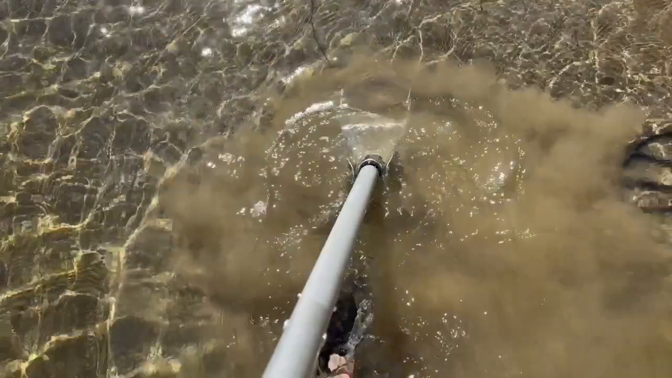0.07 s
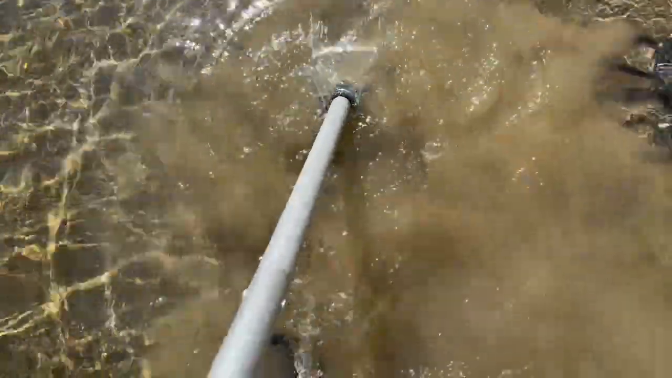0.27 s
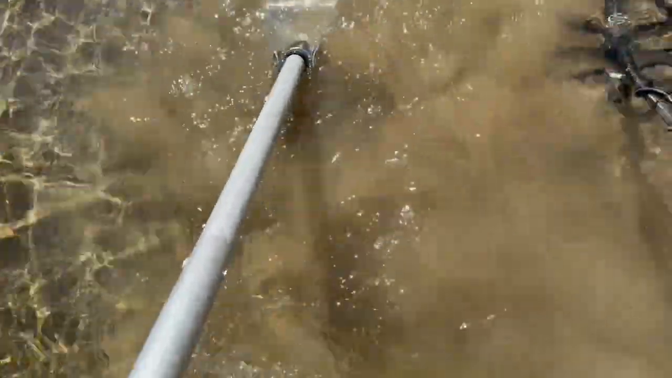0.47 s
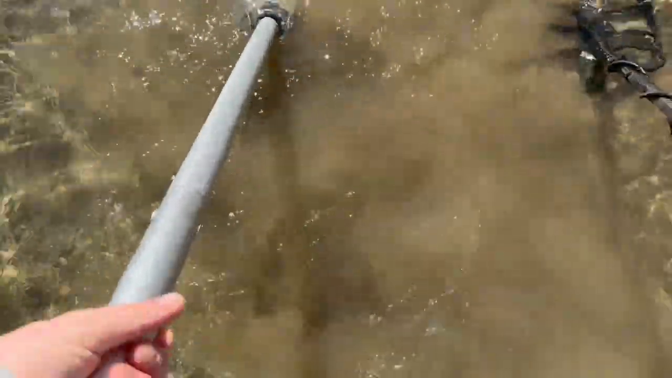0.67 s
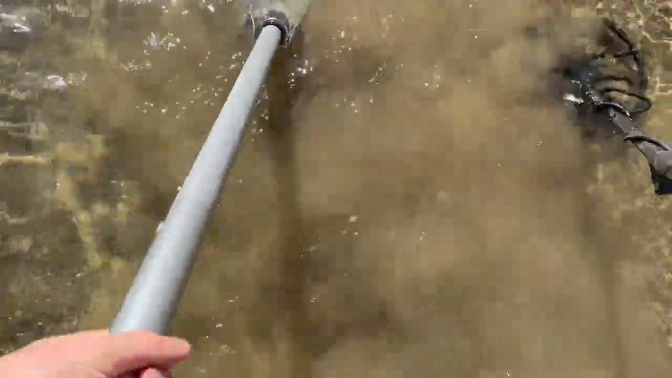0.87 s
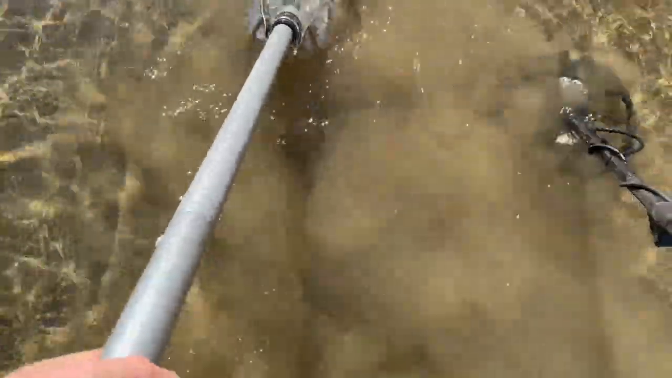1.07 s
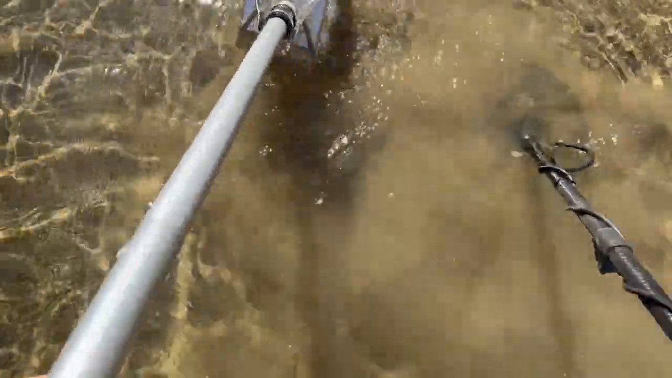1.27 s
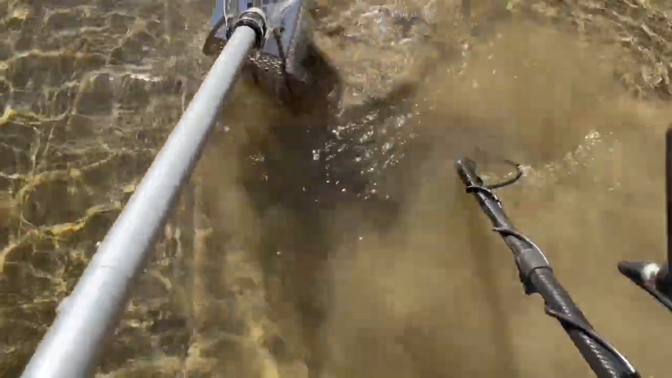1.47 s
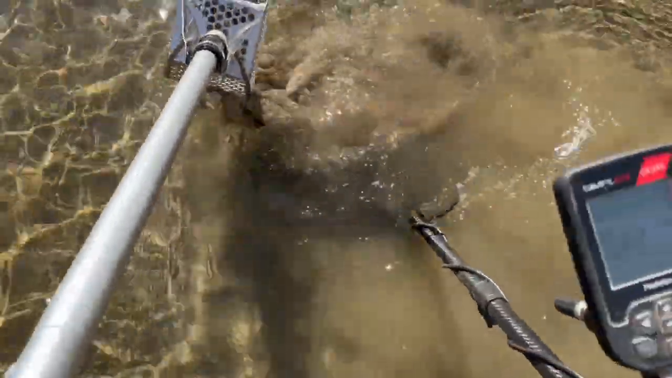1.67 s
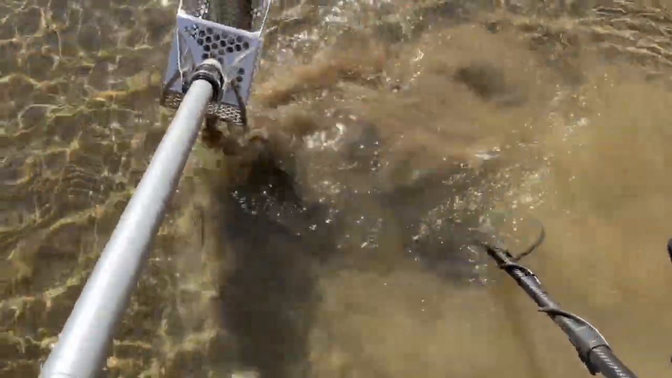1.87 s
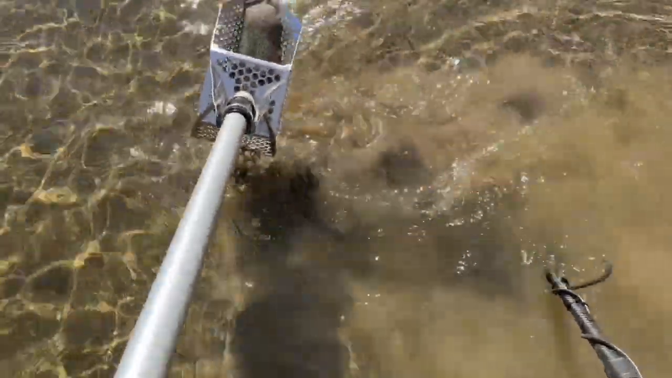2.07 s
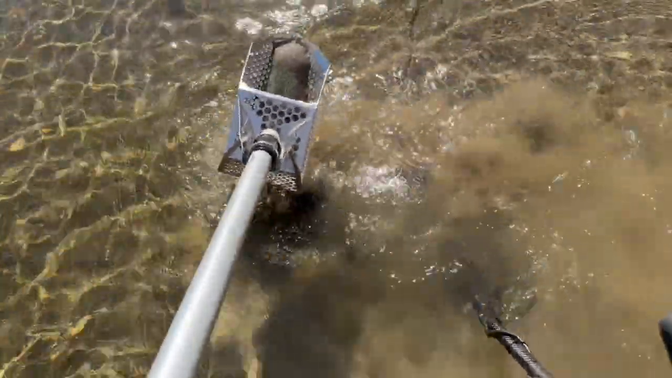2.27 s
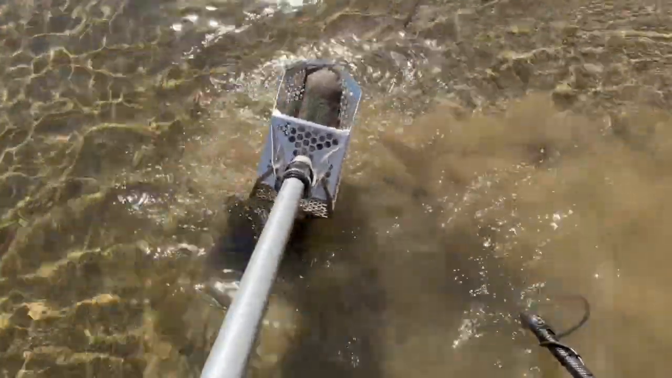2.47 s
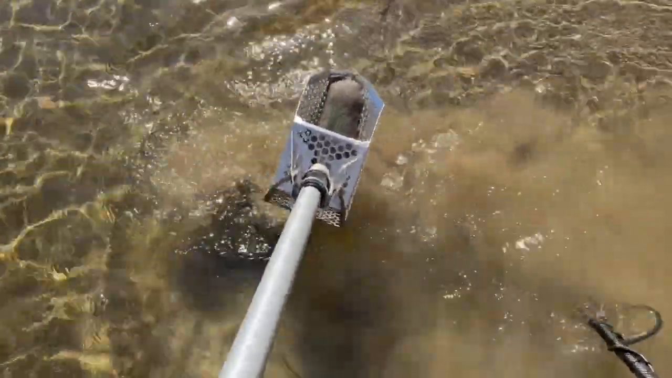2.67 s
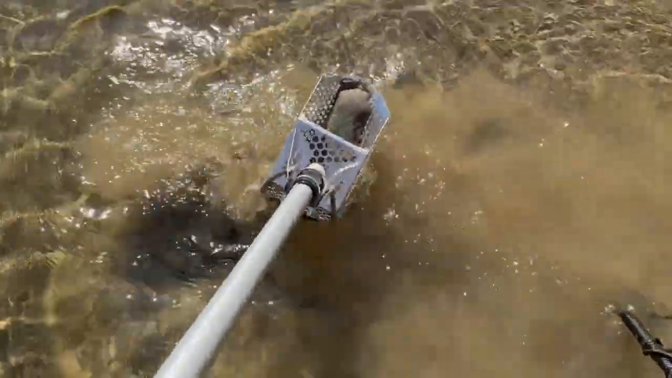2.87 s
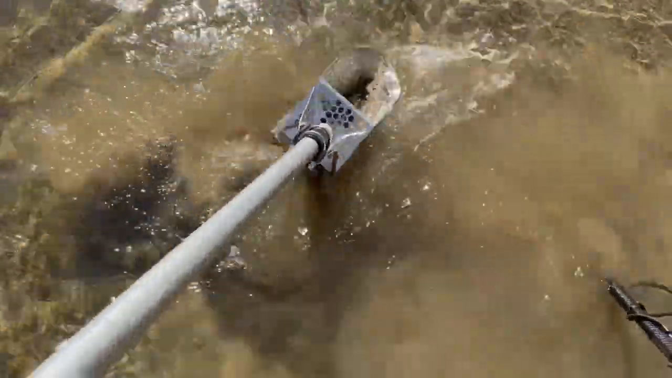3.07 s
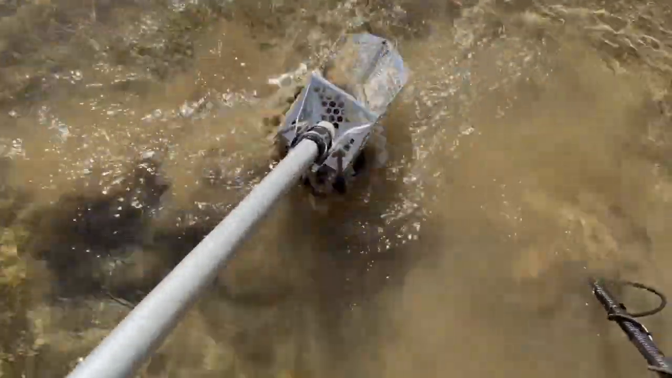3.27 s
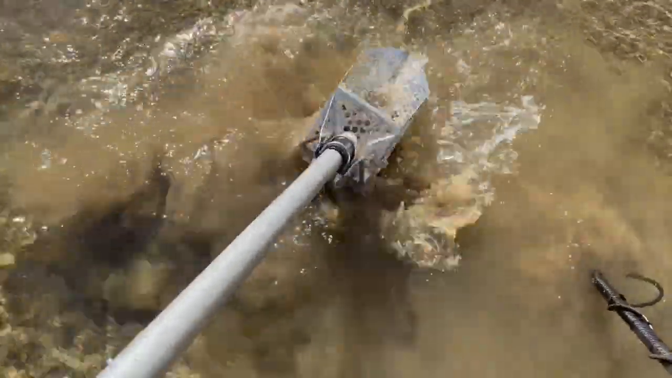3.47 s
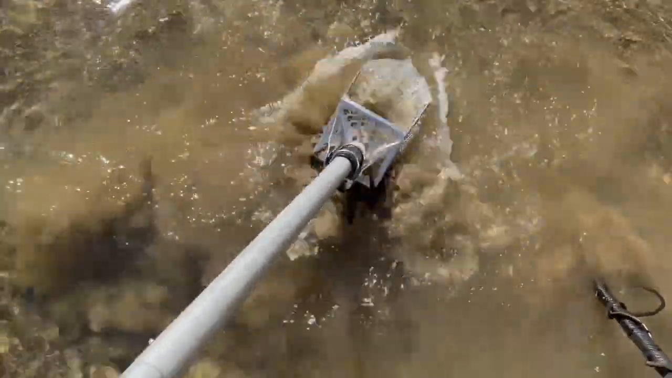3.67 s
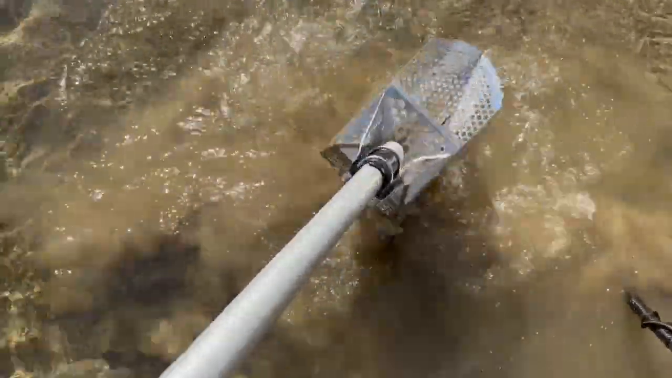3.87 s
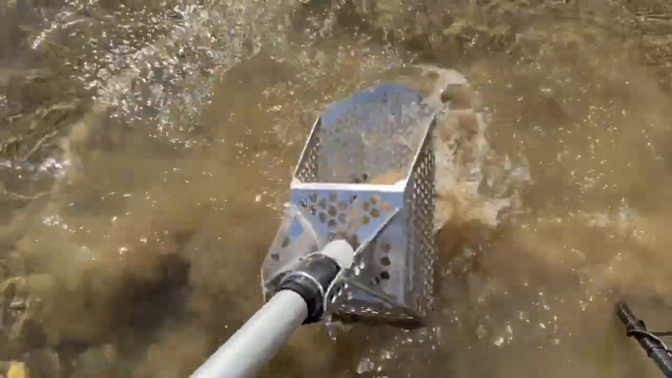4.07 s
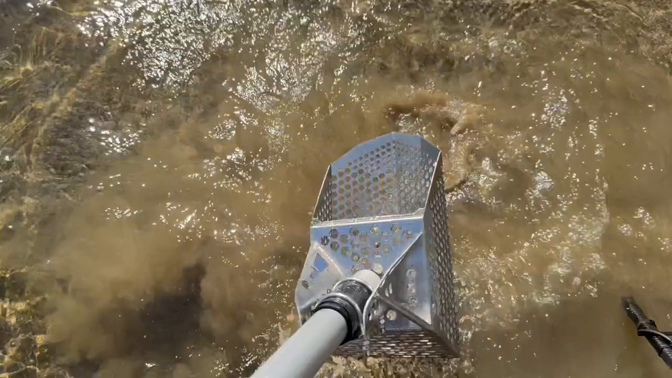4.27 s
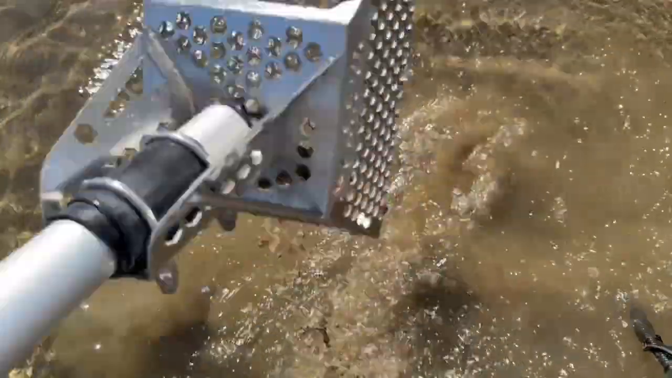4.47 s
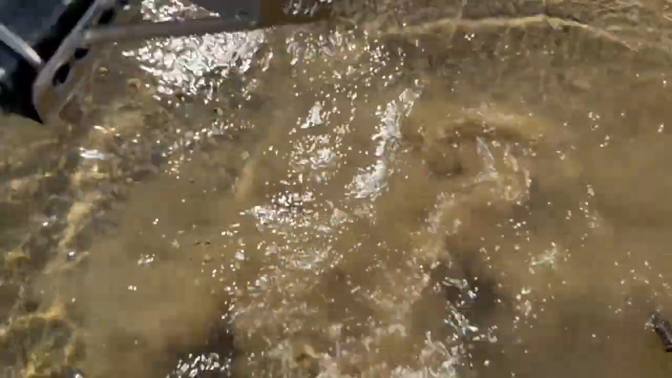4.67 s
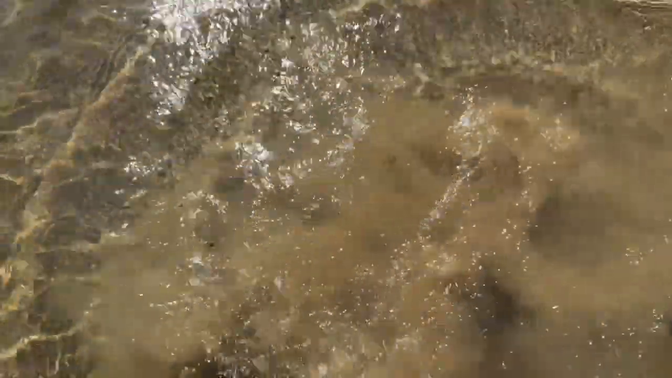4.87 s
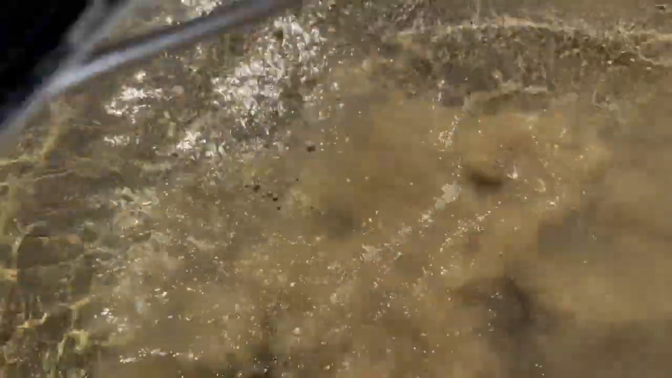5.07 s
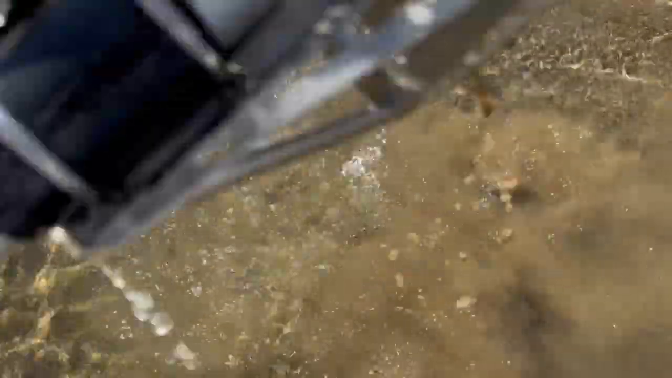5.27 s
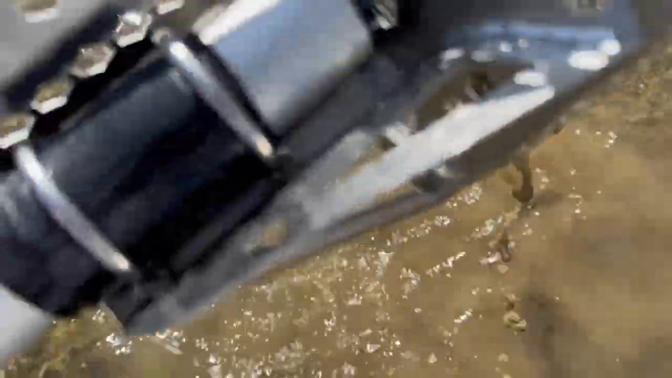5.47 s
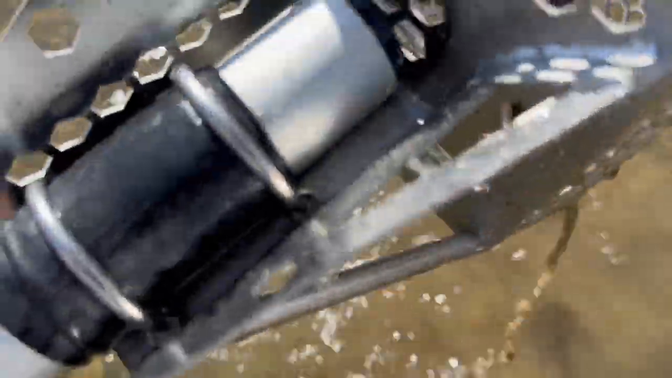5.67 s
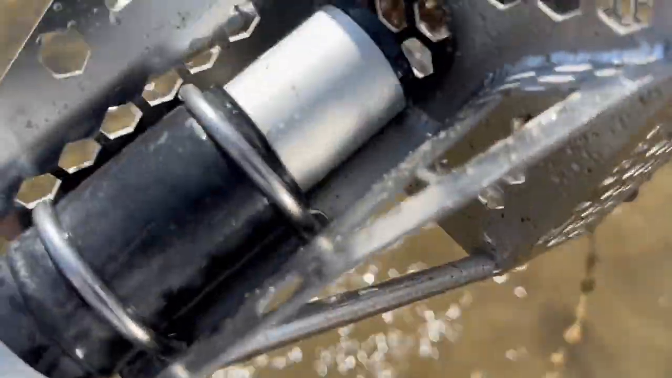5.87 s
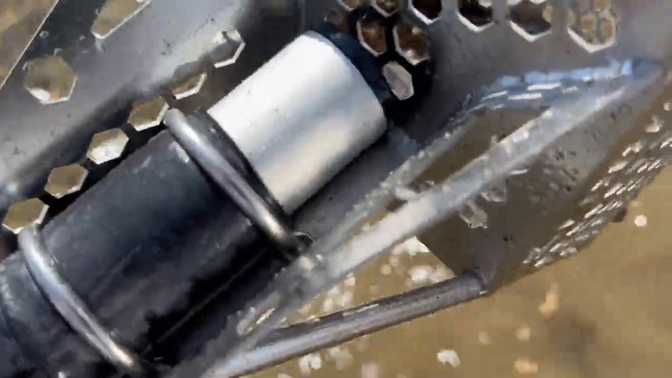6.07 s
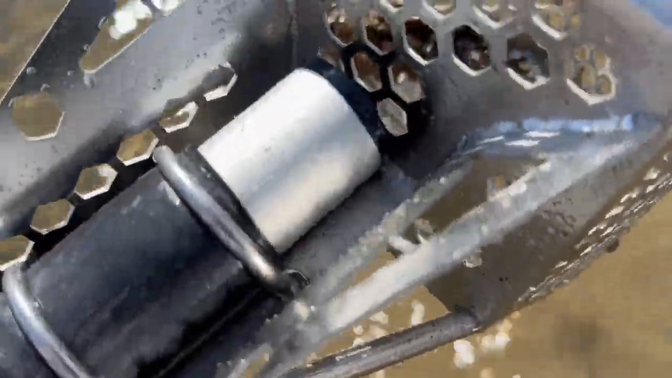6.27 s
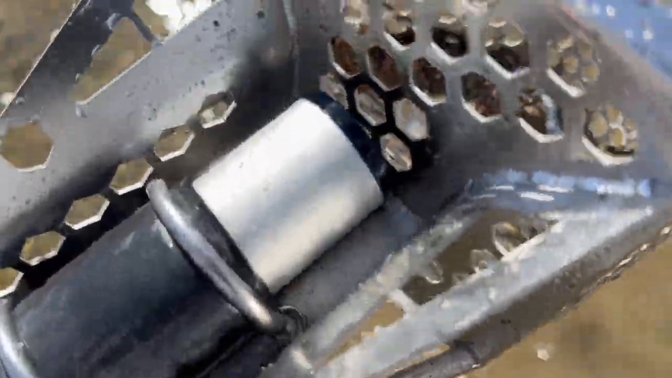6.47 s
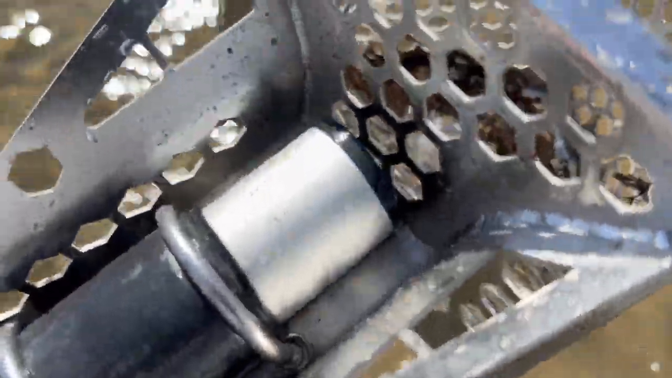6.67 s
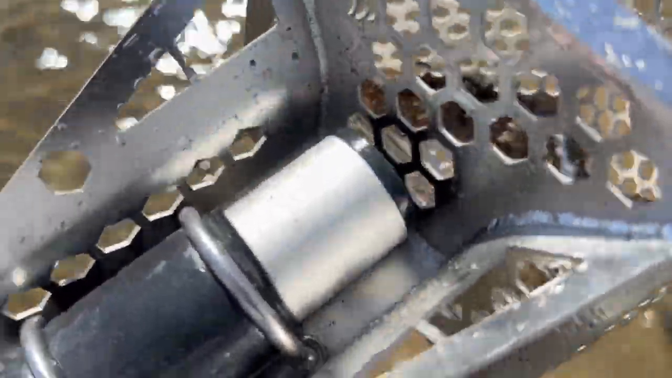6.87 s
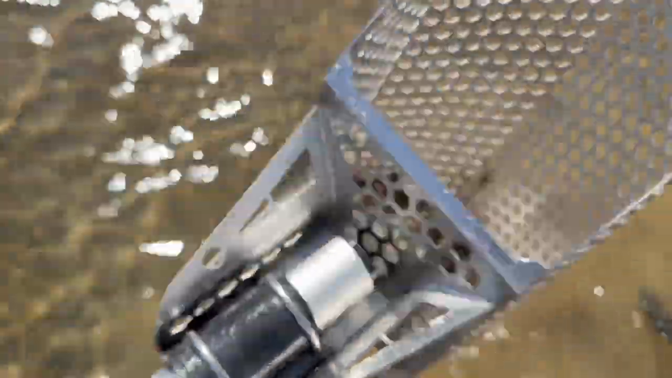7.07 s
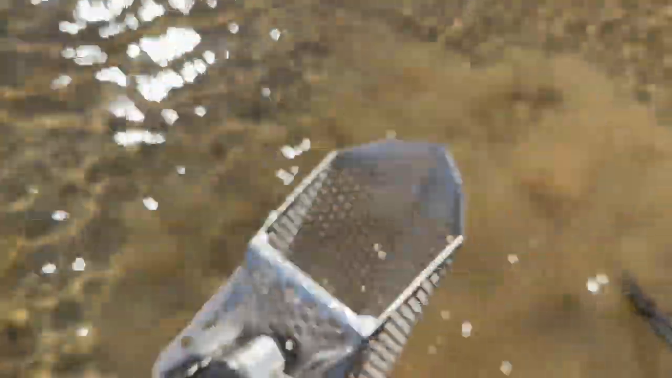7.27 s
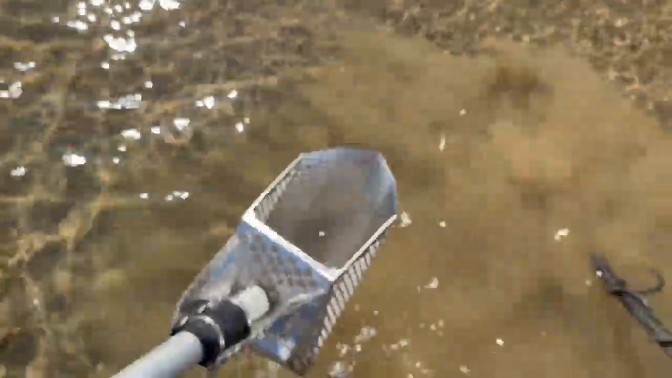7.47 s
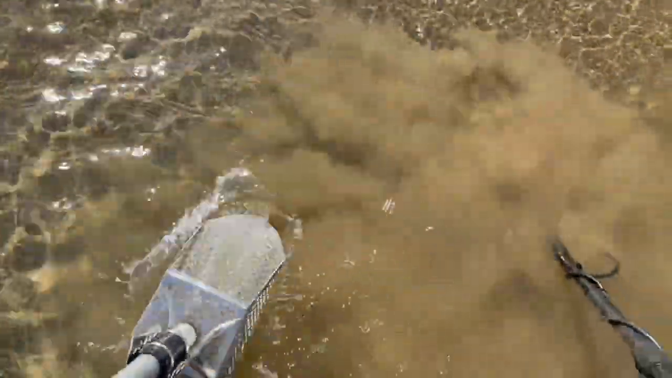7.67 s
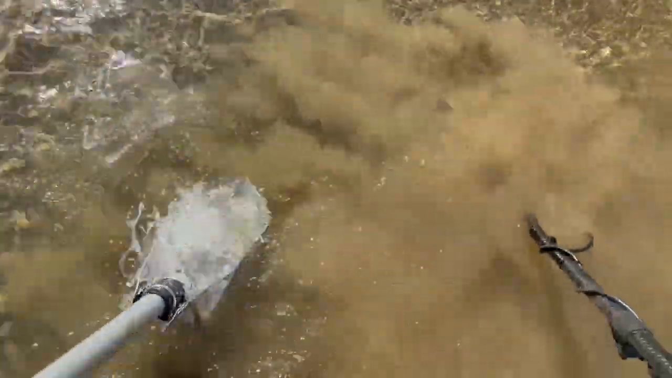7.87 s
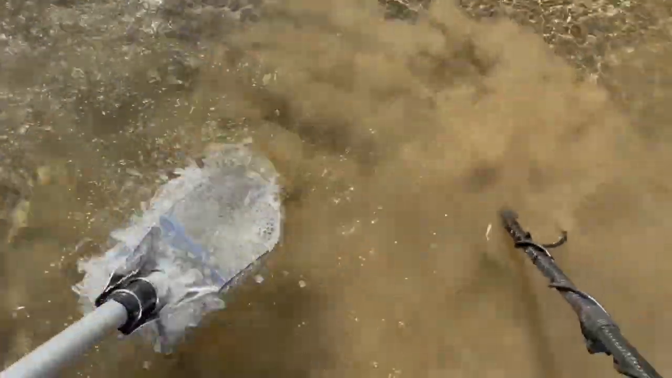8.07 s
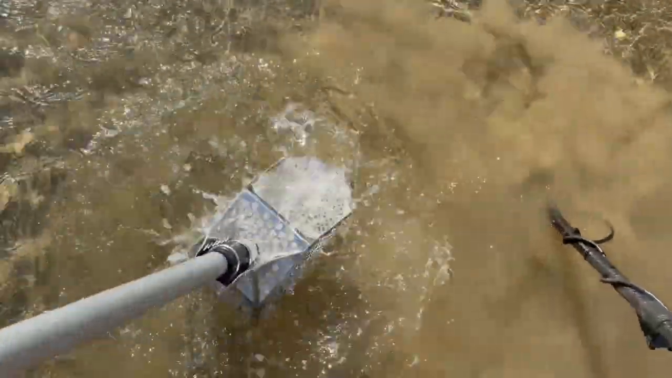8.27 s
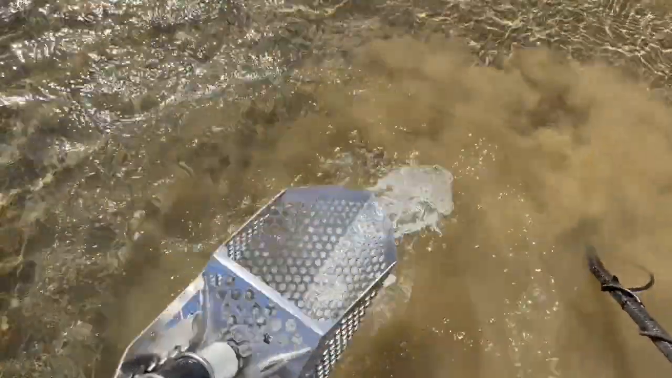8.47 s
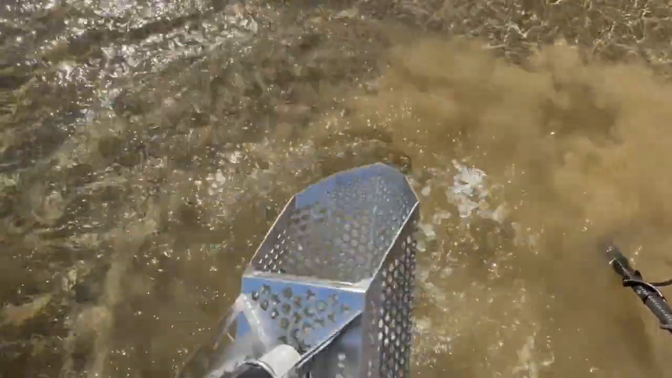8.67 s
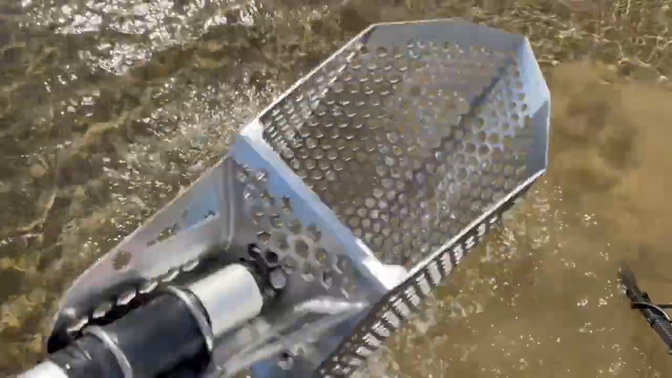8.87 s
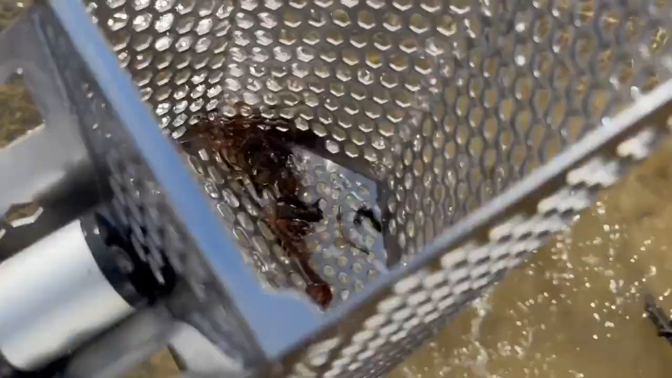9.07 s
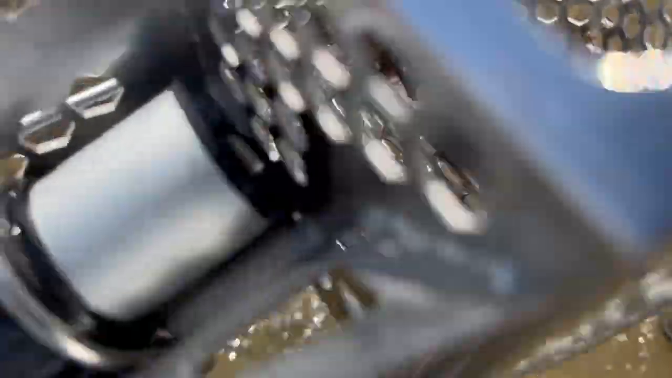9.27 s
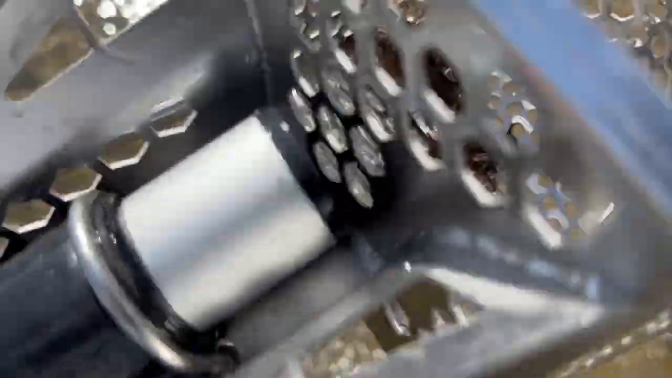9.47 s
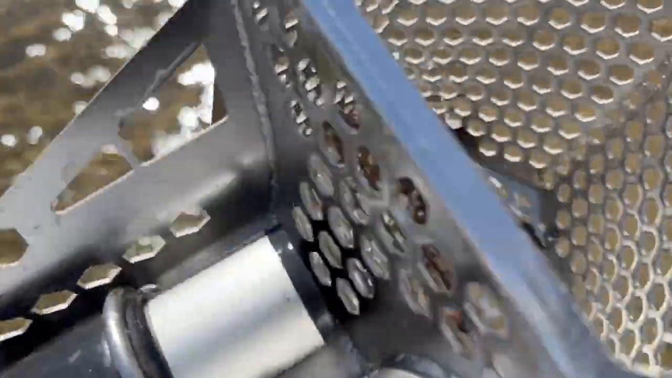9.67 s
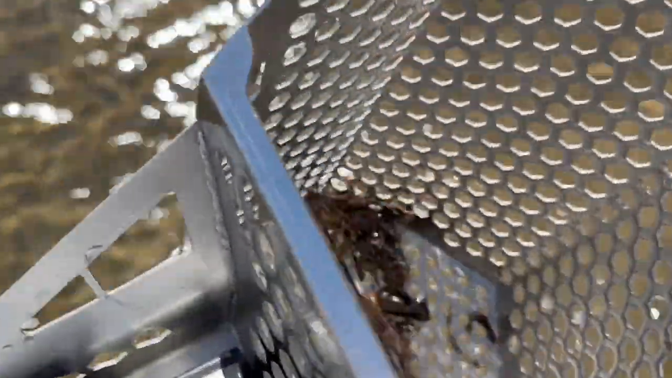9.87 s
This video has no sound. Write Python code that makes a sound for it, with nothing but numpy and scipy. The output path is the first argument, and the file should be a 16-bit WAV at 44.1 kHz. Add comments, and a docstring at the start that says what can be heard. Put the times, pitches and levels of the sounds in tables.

```python
"""A metal scoop full of holes stirs a shallow river, then digs in at 3 s: its splashes are swarms of
ringing bubbles and spray. From about 5 s it is lifted and drains; drips tick on the water and leave
bubbles, most climbing in pitch. It swishes through the air and sloshes back in just before 8 s to rinse.
Water slaps the basket and makes it ring, and just after 9 s a stone knocks in it. All along, light wind
rumbles on the two microphones and the river hisses softly."""
import sys
import numpy as np
from scipy import signal
from scipy.fft import rfft, irfft
from scipy.io import wavfile
from scipy.ndimage import uniform_filter1d

SR = 44100
rng = np.random.default_rng(int(sys.argv[2]) if len(sys.argv) > 2 else 0)


def digitize_waveform(pressure):
    """Quantize a signal to 16-bit integers and store it at the path in sys.argv[1].

    Rows of a 2-D input are taken as channels; values are limited to [-1, 1].
    """
    field = np.atleast_2d(pressure).T
    bounded = np.clip(field, -1, 1)
    quanta = np.round(bounded * 32767).astype(np.int16)
    wavfile.write(sys.argv[1], SR, quanta)


N = 437031
TIME = np.arange(N) / SR
DRAIN_START_S, DRAIN_END_S = 4.75, 7.36
SPATTER_S = .004  # length of one spatter


def churning_water():
    """Stirring traps air: big bubbles gurgle, small ones splash, the tiniest sound like spray."""
    splash_db, gurgle_db, spray_db = (stirring(column) for column in (1, 2, 3))
    splash = swarm(splash_db - 2, band_hz=(822, 4920), peak_hz=1900, falloff_db=5, cycles=14, per_s=3200,
                   spread_db=4.8, clump_db=2, clump_s=.02, apart=.6, rise=.15, lag_s=.04)
    gurgle = swarm(gurgle_db, band_hz=(238.4, 1096), peak_hz=520, falloff_db=9.7, cycles=17, per_s=600,
                   spread_db=3.5, clump_db=-2, clump_s=.024, apart=.53)
    spray = swarm(spray_db, band_hz=(3170, 17550), peak_hz=34500, falloff_db=2.3, cycles=3.5,
                  per_s=12000, spread_db=4.5, clump_db=3.5, clump_s=SPATTER_S, apart=.35, lag_s=.011)
    plinks = swarm(np.full(N, -55.), band_hz=(2150, 4570), peak_hz=3060, falloff_db=9.4, cycles=14,
                   per_s=1500, spread_db=1.5, clump_db=3.5, clump_s=.017, apart=.8, sizes=8)
    # While the basket drains, plinks replace the splash; plinks and spray gather just after each drip.
    draining = np.clip(np.minimum(TIME - DRAIN_START_S, DRAIN_END_S - TIME) / .085, 0, 1)
    after_drip = np.zeros(N)
    for start, *_ in DRIP_TICKS + SINGLE_BUBBLES:
        add(after_drip, start, np.exp(-TIME[:SR // 4] / .043))
    splash *= 1 - draining
    plinks *= draining * np.minimum(after_drip + .3, 1)
    spray *= 1 - draining * np.clip(.75 - after_drip, 0, 1)
    return splash + gurgle + spray + plinks + rush(splash_db) + sheets_and_swishes()


# Restless water between sloshes: (time [s], splash [dB], gurgle [dB], spray [dB])
RESTLESS_WATER = [(0.0, -52, -70, -76), (0.6, -57, -46, -56), (0.97, -62.5, -64.5, -63),
                  (1.38, -43.5, -51.5, -48), (2.14, -50, -46.5, -48.5), (2.5, -56, -66, -59.5),
                  (2.79, -60.5, -71, -59.5), (2.87, -40.5, -52.5, -51.5), (4.58, -55, -43, -59),
                  (4.77, -57, -85, -48), (5.36, -56, -87, -48.5), (5.98, -49.5, -55, -49),
                  (6.53, -66, -77, -54), (6.95, -53, -62, -49.5), (7.68, -58.5, -60, -52.5),
                  (7.8, -40, -37.5, -44), (9.13, -52, -55.5, -43), (9.3, -90, -84, -61.5),
                  (9.91, -77, -71, -56.5)]
# Sloshes: (peak time [s], splash [dB], gurgle [dB], spray [dB], last 10 dB up [s], first 10 dB down [s])
SCOOP_SLOSHES = [(0.138, -39.5, -65, -45.5, 0.096, 0.1), (0.25, -34, -49, -39.5, 0.026, 0.086),
                 (0.473, -45.5, -39.5, -43, 0.28, 0.087), (1.99, -42, -47, -50, 0.13, 0.057),
                 (3.033, -29.5, -43, -31, 0.072, 0.077), (3.13, -33, -53, -37, .05, 0.028),
                 (3.233, -35.5, -44, -29.5, 0.0093, 0.22), (3.4, -28.5, -30.5, -68, 0.063, 0.054),
                 (3.734, -28, -37, -33, 0.13, 0.13), (4.071, -35.5, -38.5, -32, 0.067, 0.099),
                 (4.218, -28, -52.5, -27.5, 0.13, 0.24), (7.763, -24.5, -30, -25, 0.032, 0.075),
                 (7.868, -36.5, -27, -27.5, 0.043, 0.056), (8.074, -32, -29, -30.5, 0.02, 0.059),
                 (8.209, -30, -36.5, -26.5, 0.06, 0.071), (8.312, -30, -34, -25, 0.063, 0.066),
                 (8.621, -32.5, -37, -50, 0.069, 0.46), (8.859, -36, -65.5, -30.5, 0.12, 0.13),
                 (8.993, -38.5, -37.5, -55, 0.031, 0.016)]


def stirring(column):
    """Level of one water layer in dB: each slosh swells and sinks on top of the restless water."""
    t = TIME[::64]
    power = amp(2 * curve(RESTLESS_WATER, column)[::64])
    for slosh in SCOOP_SLOSHES:
        peak, *_, rise, fall = slosh
        distance = np.where(t < peak, (peak - t) / rise, (t - peak) / fall)
        power += amp(2 * (slosh[column] - 10 * distance ** 1.2))  # a slightly rounded peak
    return np.interp(TIME, t, 10 * np.log10(power))


def swarm(level_db, band_hz, peak_hz, falloff_db, cycles, per_s, spread_db, clump_db, clump_s, apart,
          rise=.3, lag_s=0, sizes=24):
    """Many bubbles, louder toward peak_hz. Calm water makes fewer, in clumps; `apart` widens them."""
    density = np.clip(amp(.7 * (level_db + 37)), .12, 1)
    clumps = amp(clump_db * (2.5 - density) * drift(clump_s))
    clumps /= np.sqrt(density * abs(uniform_filter1d(clumps ** 2, SR // 5)))  # keeps the average level
    out = np.zeros((3, N))
    for hz in np.geomspace(*band_hz, sizes):
        chance, strength, side = rng.random(N), rng.exponential(1, N), rng.random(N)
        glide, stretch = rng.random(2)
        born = chance < density * per_s / sizes / SR
        pops = born * amp(spread_db * (.6 + .25 * density) * np.minimum(strength, 3))
        pops *= np.roll(clumps, round(lag_s * SR * glide))  # each size joins a clump up to lag_s late
        ring = bubble(hz, hz * (1 + rise * glide), cycles * (.5 + stretch) / hz, fade_db=18)
        ring *= amp(-falloff_db * np.log2(hz / peak_hz) ** 2) / np.linalg.norm(ring)
        places = np.array([side < .5, side > .75, (side > .5) & (side < .75)])  # middle, left, right
        out += signal.oaconvolve(pops * places, ring[None])[:, :N]
    return amp(level_db) * evened(out[0] + apart * out[1:])


def bubble(first_hz, last_hz, length, fade_db, pinch=0):
    """A pocket of air rings; its pitch drops as it pinches off, then glides as it nears the surface."""
    age = np.arange(round(length * SR) + 2) / (length * SR)  # 0 to 1
    cycles = age * length * first_hz
    hz = first_hz * (last_hz / first_hz) ** (np.sin(np.pi / 2 * age ** 1.42) ** 2)
    hz *= 1 + pinch * np.exp(-cycles / .72)
    soft_ends = np.clip(np.minimum(cycles, 3 * (1 - age)), 0, 1)
    return amp(-fade_db * age) * soft_ends * np.sin(2 * np.pi * np.cumsum(np.minimum(hz, SR / 2)) / SR)


# Lumps of water pushing through the holes: (time [s], level [dB], fade time [s])
HOLE_SURGES = [(3.005, -30.5, 0.01), (3.032, -35, 0.0094), (3.229, -31.5, 0.0095), (3.278, -27.5, 0.028),
               (3.376, -34, 0.01), (3.632, -36, 0.0078), (3.693, -34, .015)]
# Tone of rushing water: (frequency [Hz], level [dB])
RUSH_TONE = [(400, -3), (1000, 5), (2100, 9), (3200, 4), (8000, -2.5)]


def rush(splash_db):
    """A smooth rush follows the splash and jumps when water surges through the holes."""
    surges, t = np.zeros(N), TIME[:SR // 4]
    for start, db, decay in HOLE_SURGES:
        add(surges, start, amp(db) * np.exp(-t / decay) * np.minimum(t / .0053, 1))
    return (surges + amp(splash_db - 7 + 2.7 * drift(.03))) * noise(RUSH_TONE, shared=.43)


# Sheets of water breaking: (time [s], level [dB], fade time [s])
BREAKING_SHEETS = [(4.031, -27, 0.0097), (4.209, -11.5, 0.0095), (7.713, -23, 0.023), (7.775, -20, 0.0065),
                   (8.057, -26.5, 0.0098), (8.115, -16.5, 0.0065), (8.191, -28, 0.007),
                   (8.283, -32, 0.0061), (8.3, -22, .006), (8.316, -30, 0.0094), (8.583, -13.5, 0.018),
                   (8.625, -14.5, 0.028), (8.808, -36, 0.0059)]
# Air and fine spray as the scoop swings: (middle time [s], level [dB], half length [s])
SCOOP_SWISHES = [(7.078, -42, 0.032), (7.178, -38, 0.025), (7.439, -38, 0.034), (7.599, -33, 0.0069),
                 (7.669, -35.5, 0.088)]
# Tone of both: (frequency [Hz], level [dB])
SHEET_TONE = [(1300, -6), (2400, 11), (15000, 21)]


def sheets_and_swishes():
    """A bright hiss starts at once when a sheet of water breaks, and swells gently as the scoop swings."""
    loudness, t = np.zeros(N), TIME[:SR // 4]
    for start, db, decay in BREAKING_SHEETS:
        add(loudness, start, amp(db) * np.exp(-t / decay))
    for middle, db, half in SCOOP_SWISHES:
        loudness += amp(db) * np.exp(-((TIME - middle) / half) ** 2)
    return loudness * noise(SHEET_TONE, shared=.69)


# Bubbles heard one by one: (time [s], level [dB], first pitch [Hz], last pitch [Hz], length [s])
SINGLE_BUBBLES = [(.148, -25, 2660, 2500, 0.014), (0.15, -25, 873, 1160, 0.014),
                  (0.187, -37, 543, 580, 0.18), (0.31, -38.5, 507, 750, 0.053),
                  (0.394, -37, 460, 564, 0.038), (0.479, -21, 375, 436, 0.028),
                  (0.484, -21.5, 720, 640, 0.016), (0.575, -32.5, 458, 750, 0.042),
                  (.758, -45.5, 1200, 2900, 0.018), (0.828, -29.5, 1800, 1720, 0.0054),
                  (1.136, -43, 1190, 2100, 0.012), (1.164, -35.5, 1960, 3440, 0.02),
                  (1.724, -30.5, 806, 840, 0.048), (1.879, -32.5, 453, 435, 0.029),
                  (2.431, -38.5, 826, 930, 0.09), (2.444, -35, 1170, 1060, 0.026),
                  (2.7, -39, 1080, 1080, 0.052), (2.724, -34.5, 1730, 3060, 0.012),
                  (3.044, -24.5, 486, 526, 0.016), (4.033, -21, 425, 485, 0.0081),
                  (4.168, -25, 604, 600, 0.036), (4.194, -22, 450, 506, 0.02),
                  (4.283, -26.5, 727, 810, 0.026), (4.391, -28.5, 758, 810, 0.027),
                  (4.558, -31, 1080, 1060, 0.038), (4.628, -24.5, 446, 580, 0.0089),
                  (4.652, -33.5, 533, 1660, 0.091), (4.943, -45, 1090, 1140, 0.033),
                  (5.08, -42, 1100, 1130, 0.02), (5.225, -37.5, 1116, 1000, 0.026),
                  (5.275, -41.5, 585, 1630, 0.052), (5.455, -38, 1180, 1140, 0.046),
                  (5.572, -26, 656, 1240, 0.0057), (5.579, -38.5, 620, 1310, 0.02),
                  (5.607, -28, 1033, 920, 0.08), (5.669, -33.5, 620, 1400, 0.0082),
                  (5.682, -27.5, 820, 1260, 0.06), (5.971, -33, 945, 1410, 0.025),
                  (5.993, -32.5, 690, 1540, 0.011), (6.066, -34.5, 700, 636, 0.047),
                  (6.166, -41, 754, 670, 0.035), (6.522, -38.5, 1140, 1480, 0.0085),
                  (6.602, -28.5, 830, 1050, 0.0056), (6.734, -35.5, 1223, 1140, 0.18),
                  (6.775, -38, 564, 1430, 0.015), (6.835, -47, 730, 1160, 0.054),
                  (6.929, -48, 810, 1550, 0.023), (6.991, -28, 1360, 1700, 0.0092),
                  (7.397, -23, 686, 940, 0.095), (7.736, -16.5, 620, 416, 0.015),
                  (7.763, -19, 430, 410, 0.041), (7.852, -21, 810, 1010, 0.007),
                  (7.875, -21, 330, 245, 0.041), (7.81, -9.5, 383, 139, 0.023),
                  (7.817, -13.5, 176, 145, 0.025), (7.997, -30.5, 517, 820, 0.022),
                  (8.059, -11, 570, 462, 0.0067), (8.09, -33, 298, 494, 0.057),
                  (8.258, -27, 366, 404, 0.047), (8.474, -26, 1685, 1620, 0.026),
                  (8.618, -20, 806, 920, 0.012), (8.746, -19, 1150, 1510, 0.0088),
                  (8.784, -33.5, 290, 326, 0.092), (8.934, -28, 660, 950, 0.068),
                  (9.14, -33.5, 650, 854, 0.016), (9.321, -40, 1760, 5500, 0.0057),
                  (9.802, -24, 851, 730, 0.11)]


def single_bubbles():
    """Each bubble pinches off with a splatter and fades as it rings, less so if its pitch climbs."""
    out, t = np.zeros(N), TIME[:600]
    for start, db, first_hz, last_hz, length in SINGLE_BUBBLES:
        splatter = rng.standard_normal(len(t))
        fade_db = 5.5 + .57 * first_hz * length - 14 * np.log2(last_hz / first_hz)
        ring = bubble(first_hz, last_hz, length, fade_db, pinch=.36)
        waver = np.interp(TIME[:len(ring)] * first_hz / 3, np.arange(len(t)), splatter)  # every 3 cycles
        add(out, start, amp(db) * ring * np.exp(.25 * waver))
        add(out, start, amp(db - 10) * uniform_filter1d(splatter, size=4) * np.exp(-t / .0031))
    return out


# Drops hitting the water: (time [s], level [dB], pitch [Hz])
DRIP_TICKS = [(0.059, -20, 4590), (0.2574, -10, 2450), (4.1174, 1, 11900), (4.445, -10, 2900),
              (4.5543, -16, 2720), (4.5952, -8.5, 11600), (4.6545, -10.5, 2660), (4.846, -12.5, 6200),
              (4.945, -14.5, 2410), (4.983, -28, 3330), (5.1117, -19, 2870), (5.169, -17.5, 11700),
              (5.468, -20, 2580), (5.5348, -18.5, 9200), (5.567, -15.5, 4340), (5.638, -17.5, 11300),
              (5.6653, -18, 2700), (5.693, -17, 8000), (5.74, -8, 3600), (5.864, -20, 9000),
              (5.8975, -18, 2660), (5.927, -19.5, 3940), (5.958, -17.5, 3530), (5.97, -15.5, 8800),
              (6.026, -25.5, 2800), (6.116, -18, 9000), (6.1638, -15, 3140), (6.2476, -21, 7900),
              (6.257, -11, 8700), (6.336, -25, 2960), (6.5966, -22.5, 3970), (6.7402, -18.5, 4060),
              (6.9188, -20, 11300), (6.967, -20.5, 4220), (7.025, -27, 4800), (7.2425, -26.5, 10900),
              (7.307, -31.5, 4570), (7.429, -21.5, 3060), (9.05, -15, 4200), (9.3601, -12.5, 7980),
              (9.643, -21.5, 10200)]


def drips():
    """A drop hits the surface with a sharp snap and a very short ring."""
    out, t = np.zeros(N), TIME[:600]
    fade = np.exp(-t / .0013) + .4 * np.exp(-t / SPATTER_S)
    for start, db, hz in DRIP_TICKS:
        hiss = np.diff(rng.standard_normal(len(t) + 1))
        feedback = np.exp(-1.3 * hz / SR)  # broadly boosts the hiss around the drop's pitch
        tinted = signal.lfilter([1], [1, -2 * feedback * np.cos(2 * np.pi * hz / SR), feedback ** 2], hiss)
        snap = (.12 * evened(tinted) + .1 * hiss) * fade
        ring = .5 * np.sin(2 * np.pi * hz * t) * np.exp(-t * hz / 3) * np.minimum(t * hz, 1)
        add(out, start, amp(db) * (snap + ring))
    return out


def stone_knock():
    """A stone lands twice, so fast that it sounds like one knock: a dull thud, a crack, a faint ring."""
    out, t = np.zeros(N), TIME[:SR // 2]
    knock_s, knock_db = 9.1795, -4.5
    thud = -np.sin(2 * np.pi * 437 * t) * np.exp(-t / .0048)
    thud -= .5 * np.sin(2 * np.pi * 780 * t) * np.exp(-t / .0027)
    thud = signal.lfilter(*signal.butter(2, 230, "high", fs=SR), thud)  # a small basket gives no bass
    add(out, knock_s, thud + amp(-40) * basket_ring(t, db_per_octave=-4.6, pivot_hz=1500))
    for delay, db in ((-.0001, -2), (.0015, -2.7)):
        crack = .44 * np.sin(2 * np.pi * 3600 * t) + .5 * rng.standard_normal(len(t))
        add(out, knock_s + delay, amp(db) * crack * np.exp(-t / .0008))
    return amp(knock_db) * out


# Water slapping the basket: (time [s], level [dB]); and how much the slaps favour its high notes
SLAPS, SLAP_DB_PER_OCTAVE = [(8.586, -24), (8.627, -23)], 20


def water_slaps():
    """Slaps of water ring the basket more brightly than the stone does."""
    out = np.zeros(N)
    for start, db in SLAPS:
        add(out, start, amp(db) * basket_ring(TIME[:SR // 2], SLAP_DB_PER_OCTAVE, pivot_hz=5600))
    return out


# The metal basket's own notes: (pitch [Hz], level [dB], time to fade by 60 dB [s])
BASKET_NOTES = [(1070, -11, 0.61), (1520, -4, 0.43), (1880, -4, 0.73), (1930, -12, 0.49), (2240, 0, 0.55),
                (2237, -4, 0.59), (2700, -6, 0.4), (4440, -9, 0.34), (5580, -10, 0.27), (877, -14, 0.44)]


def basket_ring(t, db_per_octave, pivot_hz):
    """Struck metal sounds all its notes at once; notes close in pitch throb against each other."""
    return sum(amp(db - 60 * t / fade_s + db_per_octave * np.log2(hz / pivot_hz))
               * np.sin(2 * np.pi * hz * t) for hz, db, fade_s in BASKET_NOTES)


# Strength of the wind: (time [s], level [dB])
WIND_LEVEL = [(0.0, -47.5), (3.92, -44), (4.39, -46.5), (5.35, -50), (6.29, -37), (6.62, -50), (9.91, -46)]
# Tone of its rumble: (frequency [Hz], level [dB])
WIND_TONE = [(20, -49), (40, -11.5), (60, -1), (100, -4), (160, -9), (250, -20), (500, -113)]
# Gusts that thump the microphones: (time [s], level [dB], rough pitch [Hz], fade time [s])
WIND_THUMPS = [(3.736, -17, 74, 0.033), (3.799, -14.5, 85, 0.027), (6.024, -20.5, 95, 0.021),
               (6.214, -13.5, 97, 0.0065), (7.347, -24, 88, 0.0071), (8.299, -22.5, 81, 0.012)]


def wind():
    """Wind rumbles unevenly, and single gusts swing the thin skin inside each microphone a few times."""
    thumps, t = np.zeros(N), TIME[:SR // 5]
    for start, db, hz, decay in WIND_THUMPS:
        swing = np.sin(2 * np.pi * hz * decay * 2.09 * np.log1p(t / decay / 1.38))  # slows as it dies
        add(thumps, start, amp(db) * swing * np.exp(-t / decay) * np.minimum(t / .0022, 1))
    rumble = noise(WIND_TONE, shared=.81) * amp(curve(WIND_LEVEL, 1) + 1.8 * drift(.081))
    return rumble + np.array([thumps, np.roll(thumps, 40)])  # a little later on the right


# Tone of distant ripples: (frequency [Hz], level [dB])
RIPPLE_TONE = [(300, 17), (1000, 11.5), (1700, -7), (2700, -2.5), (4000, -2)]
# Tone of nearby foam: (frequency [Hz], level [dB])
FOAM_TONE = [(6000, -83.5), (9000, 41.5), (15000, 46)]


def river():
    """Distant ripples hiss all around while foam fizzes close by."""
    ripples = noise(RIPPLE_TONE + [(8000, -3.5), (10000, -22)], shared=.0053)
    return amp(-57.5) * ripples + amp(-61.5) * noise(FOAM_TONE, shared=1)


def amp(db):
    """Turns decibels into a multiplier."""
    return 10 ** (np.asarray(db) / 20)


def evened(x):
    """Scales a signal to an average power of 1."""
    return x / np.sqrt(np.mean(x ** 2) + 1e-20)


def curve(rows, column):
    """One column of a table, at every sample."""
    rows = np.array(rows)
    return np.interp(TIME, rows[:, 0], rows[:, column])


def add(mix, start, sound):
    """Mixes a sound in at `start` seconds."""
    part = mix[round(start * SR):][:len(sound)]
    part += sound[:len(part)]


def drift(seconds):
    """A smooth random wobble, about 1 in size."""
    size = max(round(seconds * SR), 1)
    return evened(uniform_filter1d(uniform_filter1d(rng.standard_normal(N), size), size))


def noise(tone, shared):
    """Left and right noise with the given tone; `shared` runs from 0 (unrelated) to 1 (the same)."""
    hz = np.fft.rfftfreq(N, 1 / SR)
    tone_hz, tone_db = np.transpose(tone)
    left, other = rng.standard_normal((2, N))
    right = shared * left + np.sqrt(1 - shared ** 2) * other
    gain = amp(np.interp(np.log(hz + 1), np.log(tone_hz), tone_db))
    return evened(irfft(rfft([left, right]) * gain, N))


def scene():
    """Water slightly to the left, the ringing basket, the quiet river and the wind."""
    water = churning_water() + single_bubbles() + drips()
    return water * amp([[.5], [-.5]]) + water_slaps() + river() + stone_knock() + wind()


# How far the left channel runs ahead of the right: (frequency [Hz], lead [radians])
LEFT_LEAD = [(0, 0), (3360, .6), (6800, -.3), (8100, 0), (9040, -2.1), (12900, -10), (16100, -16.9)]


def record(dry):
    """Left and right are out of step, mostly above 8 kHz, so the treble sounds wide; its top is cut."""
    lead = np.interp(np.fft.rfftfreq(N, 1 / SR), *np.transpose(LEFT_LEAD))
    right = irfft(rfft(dry[1]) * np.exp(-1j * lead), N)
    treble_cut = signal.firwin(301, 15800, window=("kaiser", 7), fs=SR)
    return signal.oaconvolve(np.array([dry[0], right]), treble_cut[None], "same")


dry = scene()
out = record(dry)
digitize_waveform(out)
```